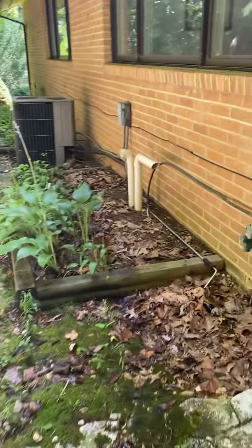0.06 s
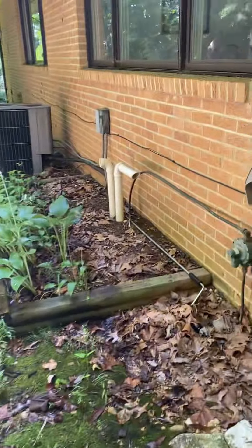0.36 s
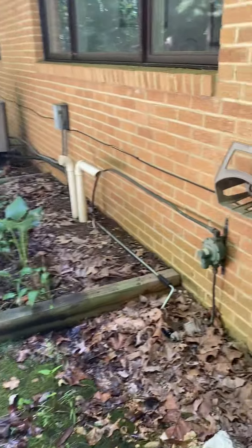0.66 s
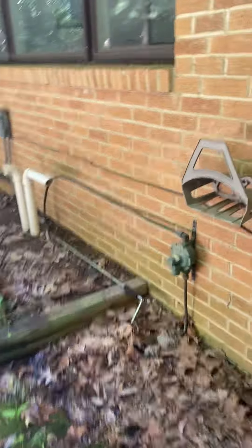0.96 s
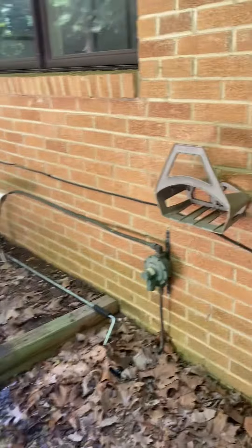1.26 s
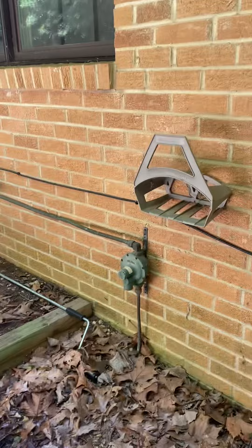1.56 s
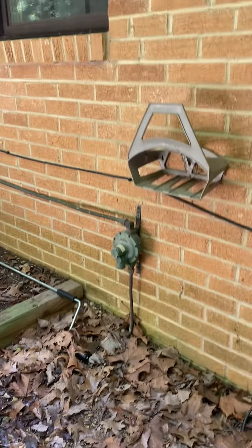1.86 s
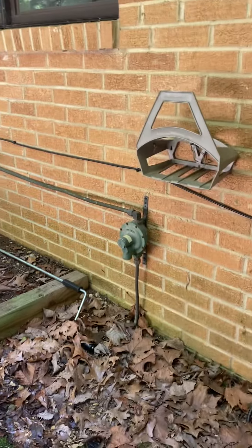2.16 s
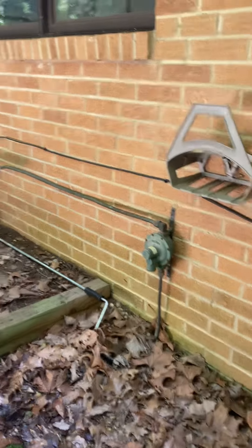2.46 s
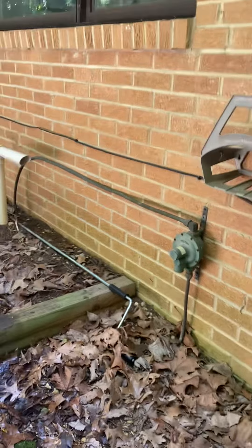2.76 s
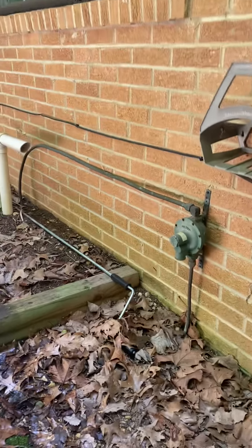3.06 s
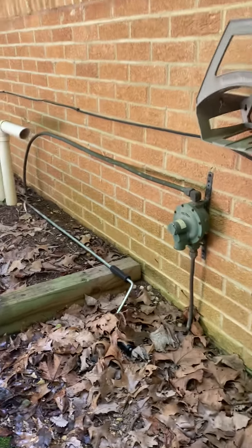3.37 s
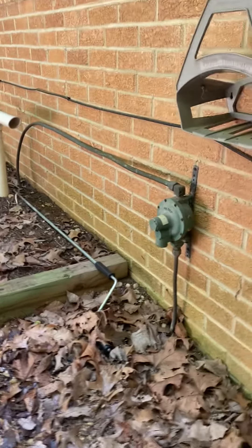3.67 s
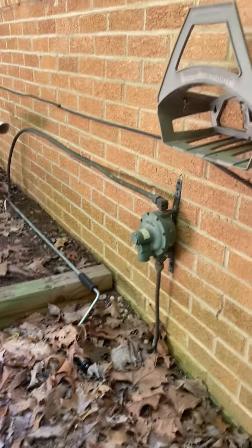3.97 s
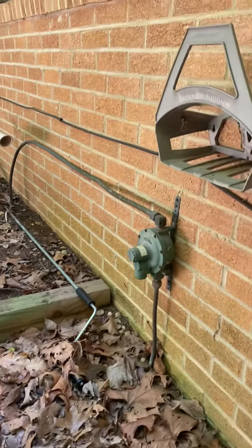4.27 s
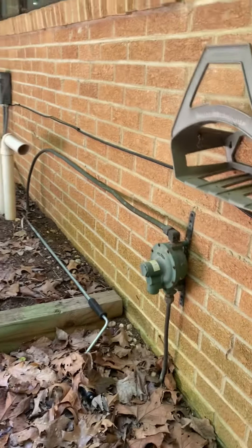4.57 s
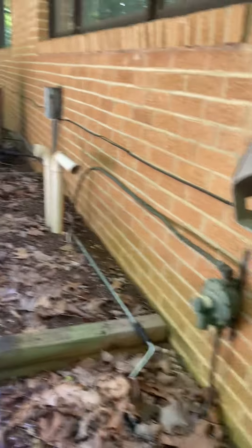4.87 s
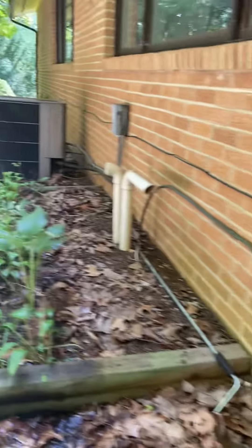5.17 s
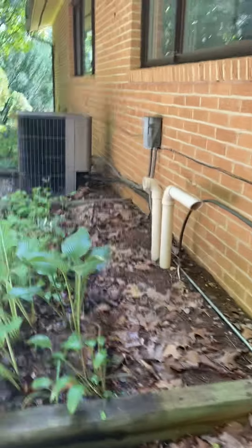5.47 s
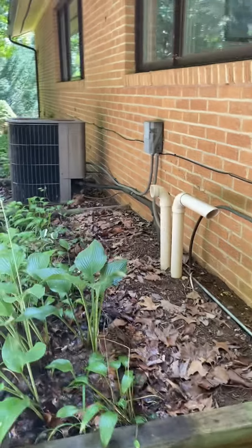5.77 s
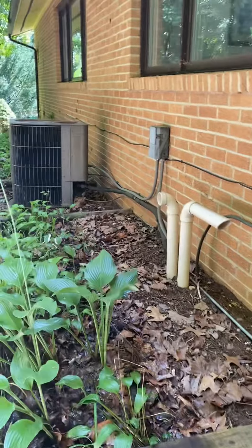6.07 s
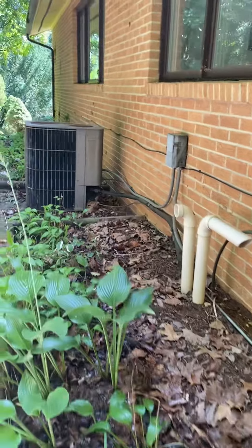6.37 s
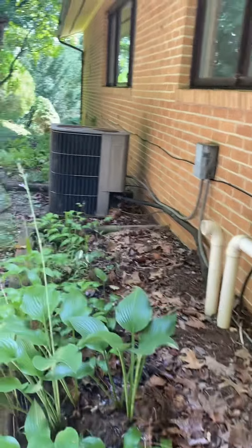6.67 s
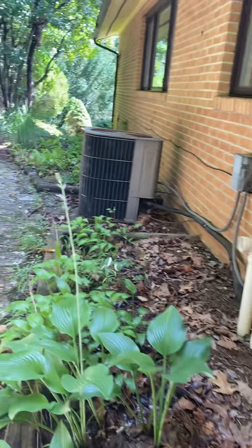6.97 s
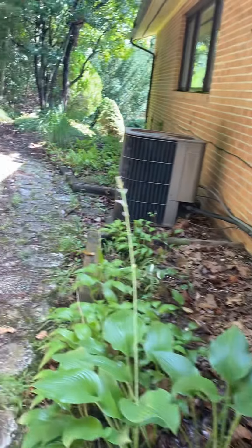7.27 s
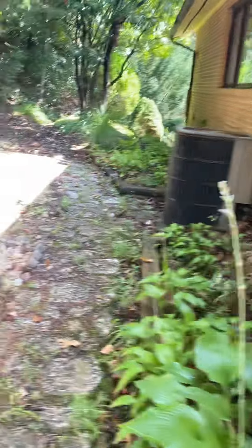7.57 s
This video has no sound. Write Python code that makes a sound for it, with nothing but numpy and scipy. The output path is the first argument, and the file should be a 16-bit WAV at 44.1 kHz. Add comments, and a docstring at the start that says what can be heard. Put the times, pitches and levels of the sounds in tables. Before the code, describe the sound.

A low, pulsing drone and an even rush of air come from an outdoor air conditioner a few metres away, heard slightly to the right as the microphone slowly turns. Small clusters of light metallic ticks rattle over the hum, and a faint whine wavers in and out. In the garden behind it, a small bird chirps thinly every second or so and a far insect chorus gradually rises.

```python
"""A garden, by a brick wall: an air-conditioning condenser runs a few metres from a slowly turning listener.
Its four-bladed fan throbs and rushes, the compressor hums with a thin whine, the steel cabinet drones.
A loose part ticks in bunches and rings the grille. The wall's echo swells and fades single tones.
Far insects shimmer; a small bird calls faintly."""
import sys
import numpy as np
from scipy import signal
from scipy.fft import rfft, irfft, next_fast_len
from scipy.io import wavfile
from scipy.ndimage import uniform_filter1d, map_coordinates

SR = 44100
rng = np.random.default_rng(int(sys.argv[2]) if len(sys.argv) > 2 else 0)


def output_pcm(signal):
    """Save a mono or channel-first signal as 16-bit PCM at the path in sys.argv[1].

    Samples are clipped to [-1, 1] before scaling.
    """
    pcm = np.clip(np.atleast_2d(signal).T, -1, 1) * 32767
    wavfile.write(sys.argv[1], SR, np.round(pcm).astype(np.int16))


N = 340893

FAN_HZ, COMPRESSOR_HZ, MAINS_HZ, TOP_HZ = 18.811, 58.63, 60.0, 15870
SLIP_HZ = COMPRESSOR_HZ - 3 * FAN_HZ

# listener's path: (time [s], nearness [dB], air brightness [dB], turn to the right ear [dB])
PATH = [(0, -1.5, 1, 5), (1.6, -1, 0.7, 0.5), (2.8, -1, -0.4, 1.5), (4.5, -0.2, 0, 2.5),
        (6.2, 0.2, 1.7, 4.5), (7.73, .5, 2, 7)]
# air through fan and coil: (frequency [Hz], density [dB/Hz])
AIR_SPECTRUM = [(20, -97), (40, -73.5), (66, -62), (120, -71.5), (155, -66.5), (200, -67.5), (225, -65.5),
                (250, -67), (305, -66.5), (340, -70.5), (420, -70), (630, -76), (760, -73), (1050, -76),
                (1280, -79), (2100, -80), (4000, -86.5), (7000, -92), (8600, -97), (16000, -103)]
# boom in the corner of wall and ground: (time [s], gain [dB], centre [Hz])
CORNER_BOOM = [(0, -3, 495), (1.2, 2, 453), (2.1, 6, 503), (2.8, 1.5, 506), (3.5, 6, 575), (4.1, 8.5, 560),
               (4.7, 7.5, 503), (5.3, 3.5, 430), (6.6, -1, 420), (7.73, -3, 600)]
# hollow band, lifted or cancelled by the wall's echo: (time [s], gain [dB], centre [Hz])
WALL_HOLLOW = [(0, 1.5, 1100), (.9, 2.5, 1100), (1.4, 2.5, 1100), (3.05, 3.5, 1200), (3.75, -2.5, 1000),
               (4.4, -.5, 1000), (5, .7, 1100), (5.6, 3, 970), (6.2, 3.5, 1040), (7, .3, 950),
               (7.6, 1.5, 720)]
# three bands of the rush: (centre [Hz], width [Hz])
RUSH_BANDS = [(780, 220), (2200, 900), (3400, 1300)]
# their gains: (time [s], low [dB], middle [dB], high [dB])
RUSH_GAINS = [(0, -1.5, -1, -1), (.7, -1, -.7, .8), (1.5, -1, -.4, 1.5), (2.1, -1.5, .3, 1.5),
              (2.9, 3, 1, .7), (3.6, 1.5, 1.5, .3), (5.1, 0, -.2, 0), (5.8, -1, -2, -.5),
              (6.3, 1.3, -2, -.3), (6.9, 0, -2.5, -.3), (7.73, 0, -.5, 0)]
# likeness of the rush at the two ears: (frequency [Hz], coherence [0-1])
EAR_COHERENCE = [(130, .999), (300, .97), (650, .62), (1200, .42), (1900, .75), (2900, .5), (4800, .55),
                 (6200, .8), (7200, .99), (9000, .75), (13500, .95)]
# effect of the turn on balance: (frequency [Hz], weight [ratio])
EAR_SHADOW = [(330, 0.078), (720, 1.37), (1300, 0.73), (2500, 0.17), (5000, 0.024)]
# left ear's phase lead: (frequency [Hz], lead [rad])
EAR_LEAD = [(150, 0), (300, -.1), (600, -.8), (900, -.2), (1250, -.4), (1600, .3), (3100, 1.1), (5200, .6),
            (6200, 1.8), (7000, 3), (7900, 3.45), (10400, 6.3), (12700, 9.1), (14400, 9.7), (16000, 12.4)]
# fan tones, blade pass at order 4: (shaft order, level [dB])
FAN_TONES = [(4, -33), (7, -54), (10, -58), (12, -54), (17, -57.5), (20, -55.5), (24, -57.5)]
# steady compressor tones: (shaft order, level [dB])
COMPRESSOR_TONES = [(1, -50), (7, -56), (9, -61.5), (18, -65), (24, -72)]
# hums trading places along the wall:
# (time [s], compressor order 2 [dB], order 5 [dB], order 6 [dB], fan order 16 [dB])
WALL_HUMS = [(0, -42.5, -47.5, -56, -50), (.85, -42.5, -45, -49, -48), (1.25, -44, -49, -51, -49),
             (2.8, -45, -48, -57, -50), (3.6, -46.5, -46.5, -52, -48), (4.9, -47, -44.5, -58, -46.5),
             (5.85, -45, -56, -45.5, -52), (6.5, -44.5, -66, -45, -55), (7.1, -44, -49, -47, -52),
             (7.73, -44, -55, -53, -55)]
# whine between swells: (shaft order, level [dB])
WHINE_FLOOR = [(17, -62), (25, -65), (26, -66.5), (27, -69.5), (48, -67), (52, -75), (54, -69)]
# standing-wave crests on the path: (time [s], shaft order, width [s], level [dB])
WHINE_CRESTS = [(0.38, 17, 0.17, -64), (1.9, 17, 1.3, -64), (5.7, 17, .6, -66), (6.65, 17, .8, -59),
                (.52, 25, .4, -63), (2.15, 25, .4, -64), (2.8, 25, .4, -61), (3.3, 25, 0.36, -56.5),
                (4.3, 25, 0.72, -64), (5.6, 25, .25, -63), (7.4, 25, 0.33, -70), (.52, 26, 0.87, -56.5),
                (3.4, 26, 0.8, -57.5), (5.2, 26, 1.1, -56.5), (7.4, 26, 0.65, -58.5), (4.25, 27, .9, -61),
                (5.6, 27, .3, -60), (6.6, 27, 1.1, -58.5), (0.53, 48, 0.44, -68), (6.3, 48, .45, -66),
                (7.25, 48, 0.64, -62), (.31, 52, 0.1, -59), (.92, 52, .18, -59), (1.5, 52, .3, -63),
                (2.1, 52, .2, -67), (3.05, 52, 0.57, -62.5), (4.3, 52, .28, -63), (5.15, 52, 0.52, -59.5),
                (5.85, 52, .22, -62), (6.3, 52, 0.3, -64), (7.28, 52, 0.19, -60), (6.5, 54, 1.2, -72)]
# throbbing hums: (compressor order, fan order, crest time [s], tone [dB], sidebands -2, -1, +1 [dB])
DRONE_TONES = [(1, 2, 0.17, -60, -73, -51, -59.5), (2, 2, .115, -48.5, -50.5, -67, -57.5),
               (3, 0, 0.2, -59, -70, -55.5, -63), (4, -1, 0.455, -50, -72, -54.5, -65),
               (4, 0, .15, -44, -60, -55, -65.5)]
# drone strength and throb depth along the wall: (time [s], gain [dB])
DRONE_GAIN = [(0, -2), (1.3, -.3), (4, .3), (5.3, -.2), (7.73, 0)]
# panel sum and difference tones: (compressor order, fan order, level [dB])
CABINET_TONES = [(3, -6, -53), (2, 1, -57), (4, 1, -57.5), (3, 4, -68), (4, 2, -60.5), (4, 4, -58),
                 (6, -2, -56.5), (7, 1, -57)]
# insect chorus: (time [s], level [dB])
INSECT_LEVEL = [(0, -65.5), (2, -64), (3, -65), (4, -61), (5, -57.8), (6, -57.2), (7, -56.3), (7.73, -56.3)]
# its shrill: (frequency [Hz], gain [dB])
INSECT_SPECTRUM = [(3500, -25), (4700, -5), (5400, 1), (6200, 0), (6750, 4), (7200, 0), (7850, -2),
                   (8300, -16), (11000, -35)]
# hard strikes of the loose part: (time [s], level [dB])
STRIKES = [(0.02, -41.5), (0.1226, -44.5), (0.395, -50), (0.4464, -46), (0.4978, -42.5), (0.5492, -43),
           (0.8724, -50), (0.9188, -42.5), (0.9752, -42), (1.0261, -46), (1.2984, -46), (1.3498, -42.5),
           (1.4017, -46), (1.4521, -41), (1.503, -50), (1.723, -46), (1.7759, -41), (1.8267, -39),
           (1.9295, -44), (1.9814, -48), (2.2004, -48), (2.2536, -40.5), (2.3062, -45), (2.3565, -40.5),
           (2.4074, -42.5), (2.6798, -43.5), (2.731, -41), (2.8853, -47), (3.1577, -44), (3.3124, -47),
           (3.5833, -43), (3.6361, -39), (3.687, -40), (3.7374, -47), (3.7863, -46), (4.0103, -45),
           (4.0622, -44), (4.1135, -43.5), (4.4877, -43), (4.5396, -42.5), (4.6414, -47), (4.9142, -45),
           (4.9656, -43.5), (5.018, -44), (5.1188, -45), (5.3916, -43.5), (5.5463, -46.5), (5.5962, -49),
           (5.8192, -44), (5.8701, -44.5), (6.0227, -47), (6.2447, -46), (6.2961, -42), (6.7221, -46),
           (6.7735, -39.5), (6.9267, -47), (7.199, -38.5), (7.251, -40.5), (7.6246, -47), (7.6779, -41.5)]
# their ring: (frequency [Hz], gain [dB])
STRIKE_SPECTRUM = [(1500, -16), (3000, -1), (4500, -4.5), (7000, -4.5), (8900, 0), (10600, -3), (11150, 1),
                   (11450, -1), (11900, 5), (12400, -2), (16000, -7)]
# bird phrases: (start [s], level [dB])
BIRD_PHRASES = [(.68, -53), (1.92, -52.5), (3.42, -54.5), (3.75, -58), (4.54, -55.5), (5.98, -49.3),
                (7.36, -49.3)]
# notes of each phrase: (delay [s], top pitch [Hz], gain [dB])
BIRD_NOTES = [(0, 7900, -3), (.08, 8060, 0), (.175, 7990, -1)]


def amp(db):
    """Decibels to gain."""
    return 10 ** (np.asarray(db) / 20)


def unit(x):
    """Scale to rms 1."""
    return x / np.sqrt(np.mean(x ** 2) + 1e-20)


def at_hz(points, hz):
    """(frequency [Hz], value) rows read on a log axis."""
    knots_hz, values = np.transpose(points)
    return np.interp(np.log(hz + 1), np.log(knots_hz + 1), values)


def curves(rows, t):
    """Each column after the time, read at times t."""
    knots_s, *columns = np.transpose(rows)
    return [np.interp(t, knots_s, column) for column in columns]


def wobble(rate_hz):
    """Smooth random curve, rate_hz knots a second."""
    coarse = np.arange(0, N + 128, 128)
    knots = rng.standard_normal(int(N * rate_hz / SR) + 4)
    smooth = map_coordinates(knots, [coarse * rate_hz / SR], mode="nearest")
    return np.interp(np.arange(N), coarse, smooth)


def filtered(x, response):
    """Apply a frequency response."""
    size = next_fast_len(N + SR // 4)
    return irfft(rfft(x, size) * response(np.fft.rfftfreq(size, 1 / SR)), size)[..., :N]


def stereo_noise(response, coherence):
    """Coloured stereo noise, rms 1."""
    spread = np.arccos(coherence) / 2
    mid, side = filtered(rng.standard_normal((2, N)), response) * [[np.cos(spread)], [np.sin(spread)]]
    return unit(np.array([mid + side, mid - side]))


def bell(hz, centre_hz, width_hz):
    """Resonance curve, 1 at centre."""
    return 1 / (1 + (2 * (hz - centre_hz) / width_hz) ** 2)


def shaft_angle(hz, drift):
    """Angle [rad] of a shaft whose speed drifts with load."""
    return 2 * np.pi * np.cumsum(hz * (1 + drift * wobble(3.04))) / SR


def tone(angle_rad, rms_db):
    """Sine with random start phase."""
    return np.sqrt(2) * amp(rms_db) * np.sin(angle_rad + rng.uniform(0, 2 * np.pi))


def add(track, start_s, sound):
    """Mix a short sound in."""
    part = track[round(start_s * SR):][:len(sound)]
    part += sound[:len(part)]


def air_rush(patchy_db=0.9, boom_width_hz=127, hollow_width_hz=260):
    """Turbulence, coloured by wall and ground echoes; brightness and balance follow the path."""
    hz, t, noise = signal.stft(rng.standard_normal((2, N)), SR, nperseg=2048)
    hz = hz[:, None]
    near_db, bright_db, turn_db = curves(PATH, t)
    boom_db, boom_hz = curves(CORNER_BOOM, t)
    hollow_db, hollow_hz = curves(WALL_HOLLOW, t)
    speckle = rng.standard_normal(noise.shape[1:])
    patches = unit(uniform_filter1d(uniform_filter1d(speckle, 12, axis=0), 9, axis=1))
    level_db = at_hz(AIR_SPECTRUM, hz) + near_db + bright_db * hz / (hz + 700) + patchy_db * patches
    level_db += boom_db * bell(hz, boom_hz, boom_width_hz)
    level_db += hollow_db * bell(hz, hollow_hz, hollow_width_hz)
    level_db += sum(db * bell(hz, *band) for db, band in zip(curves(RUSH_GAINS, t), RUSH_BANDS))
    spread = np.arccos(at_hz(EAR_COHERENCE, hz)) / 2
    mid, side = noise[0] * np.cos(spread), noise[1] * np.sin(spread)
    right_gain = amp(turn_db * at_hz(EAR_SHADOW, hz) / 2)
    ears = np.array([(mid + side) / right_gain, (mid - side) * right_gain]) * amp(level_db)
    return np.sqrt(SR / 2) * signal.istft(ears, SR, nperseg=2048)[1][:, :N]


def fan(t, angle_rad, flutter_db=0.64):
    """Blade tones flutter in uneven inflow; order 16 beats against compressor order 5."""
    near_db = curves(PATH, t)[0]
    blades = sum(tone(order * angle_rad, db + flutter_db * wobble(9)) for order, db in FAN_TONES)
    return amp(near_db) * blades + tone(16 * angle_rad, curves(WALL_HUMS, t)[-1])


def compressor(t, angle_rad, waver_db=0.2):
    """Shaft harmonics: steady tones, hums that trade places, whine."""
    steady = [(order, db - waver_db * wobble(2.22)) for order, db in COMPRESSOR_TONES]
    trading = list(zip((2, 5, 6), curves(WALL_HUMS, t)))
    return sum(tone(order * angle_rad, db) for order, db in steady + trading + whine_levels(t))


def whine_levels(t):
    """(shaft order, level curve [dB]) per whine tone: weak floor plus a swell at each crest."""
    coarse_s = t[::256]
    levels = []
    for order, floor_db in WHINE_FLOOR:
        swells = sum(amp(db) * 0.5 ** ((2 * (coarse_s - crest_s) / width_s) ** 2)
                     for crest_s, crest_order, width_s, db in WHINE_CRESTS if crest_order == order)
        levels.append((order, np.interp(t, coarse_s, 20 * np.log10(amp(floor_db) + swells))))
    return levels


def drone(t, compressor_rad, fan_rad, magnetic_db=-47.3):
    """Low hums throb as the compressor slips past 3x fan speed; the motor's magnetic hum adds a beat."""
    strength = amp(curves(DRONE_GAIN, t)[0])
    hum = amp(magnetic_db) * np.cos(2 * np.pi * 4 * MAINS_HZ * t)
    for compressor_order, fan_order, crest_s, tone_db, *sidebands_db in DRONE_TONES:
        angle_rad = compressor_order * compressor_rad + fan_order * fan_rad
        slip_rad = 2 * np.pi * SLIP_HZ * (t - crest_s)
        sidebands = sum(amp(db) * np.cos(angle_rad + k * slip_rad)
                        for k, db in zip((-2, -1, 1), sidebands_db))
        hum += amp(tone_db) * np.cos(angle_rad) + strength * sidebands
    return np.sqrt(2) * strength * hum


def cabinet(compressor_rad, fan_rad, waver_db=1):
    """Steel panels, driven by both shafts, hum at sums and differences of their rates."""
    return sum(tone(compressor_order * compressor_rad + fan_order * fan_rad, db + waver_db * wobble(2.07))
               for compressor_order, fan_order, db in CABINET_TONES)


def insects(t, shimmer_db=1.2):
    """Far chorus, louder as the listener turns from wall to garden."""
    level_db = curves(INSECT_LEVEL, t)[0] + shimmer_db * wobble(27)
    return amp(level_db) * stereo_noise(lambda hz: amp(at_hz(INSECT_SPECTRUM, hz)), coherence=1)


def rattle(trim_db=-0.5, rise_s=0.0015, t60_s=0.047, echo_db=-11, echo_t60_s=0.25,
           chatter_db=-58, scatter_db=3, scrape_db=2.2, wander_db=2.5):
    """A loose part chatters about once a fan turn and strikes harder in bunches."""
    t = np.arange(SR // 10) / SR
    blow = (1 - np.exp(-t / rise_s)) * (amp(-60 * t / t60_s) + amp(echo_db - 60 * t / echo_t60_s))
    envelope = np.zeros(N)
    for strike_s, db in STRIKES:
        add(envelope, strike_s, amp(db + trim_db) * blow)
    for (start_s, _), (end_s, _) in zip(STRIKES, STRIKES[1:]):
        turns = max(round((end_s - start_s) * FAN_HZ), 1)
        for touch_s in np.linspace(start_s, end_s, turns + 1)[1:-1]:
            add(envelope, touch_s, amp(chatter_db + scatter_db * rng.standard_normal()) * blow)
    envelope *= amp(scrape_db * wobble(300))
    ring = stereo_noise(lambda hz: amp(at_hz(STRIKE_SPECTRUM, hz)), coherence=1)
    # the contact point wanders, favouring different bands
    bands = [filtered(ring, lambda hz: (hz >= low_hz) & (hz < high_hz))
             for low_hz, high_hz in ((0, 9500), (9500, 11500), (11500, TOP_HZ))]
    return envelope * unit(sum(band * amp(wander_db * wobble(20)) for band in bands))


def grille(ring_hz=3090, width_hz=80, idle_db=-65.5, struck_db=-19, t60_s=0.4):
    """Narrow steel resonance, stirred by airflow, rung by each hard strike."""
    t = np.arange(SR // 2) / SR
    power = np.full(N, amp(idle_db) ** 2)
    for strike_s, db in STRIKES:
        add(power, strike_s, amp(db + struck_db - 60 * t / t60_s) ** 2)
    return np.sqrt(power) * stereo_noise(lambda hz: bell(hz, ring_hz, width_hz), coherence=0.78)


def bird(note_s=0.064, slur=0.04, second_ratio=0.925, second_db=-6.5, trees_t60_s=0.36):
    """Thin upslurred notes from both sides of the syrinx, smeared by tree echoes."""
    progress = np.linspace(0, 1, int(note_s * SR))
    envelope = np.sqrt(np.hanning(len(progress)))
    song = np.zeros(N)
    for start_s, phrase_db in BIRD_PHRASES:
        for delay_s, top_hz, note_db in BIRD_NOTES:
            angle_rad = 2 * np.pi * np.cumsum(top_hz * (1 - slur * (1 - progress) ** 2)) / SR
            db = phrase_db + note_db
            voices = tone(angle_rad, db) + tone(second_ratio * angle_rad, db + second_db)
            add(song, start_s + delay_s, envelope * voices)
    t = np.arange(SR // 3) / SR
    trees = rng.standard_normal(len(t)) * amp(-60 * t / trees_t60_s)
    # far off: more echo than direct sound
    return song / 2 + signal.fftconvolve(song, trees / np.linalg.norm(trees))[:N]


def scene():
    """Condenser and garden, stereo."""
    t = np.arange(N) / SR
    fan_rad = shaft_angle(FAN_HZ, drift=0.0005)
    compressor_rad = shaft_angle(COMPRESSOR_HZ, drift=0.0001)
    shaft_tones = fan(t, fan_rad) + compressor(t, compressor_rad)
    mixed_tones = drone(t, compressor_rad, fan_rad) + cabinet(compressor_rad, fan_rad)
    return air_rush() + shaft_tones + mixed_tones + insects(t) + rattle() + grille() + bird()


def record(dry):
    """Phase offset between the ears; nothing above TOP_HZ."""
    lead_share = np.array([[0.5], [-0.5]])
    return filtered(dry, lambda hz: np.exp(1j * lead_share * at_hz(EAR_LEAD, hz)) * (hz < TOP_HZ))


dry = scene()
out = record(dry)
output_pcm(out)
```